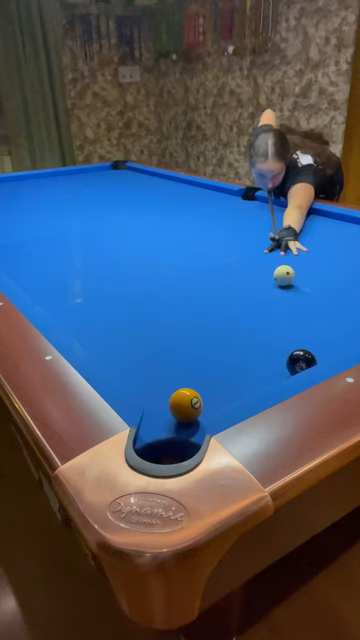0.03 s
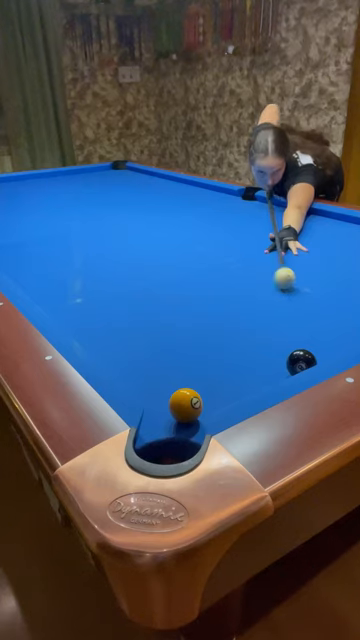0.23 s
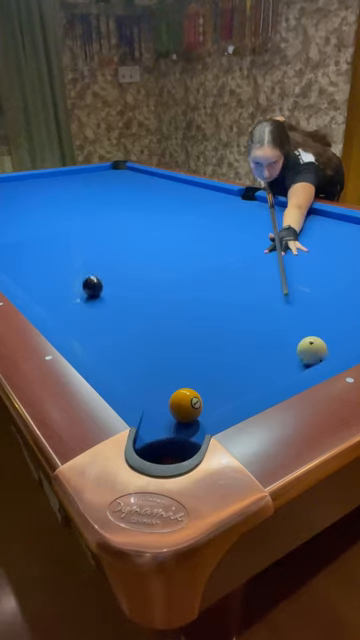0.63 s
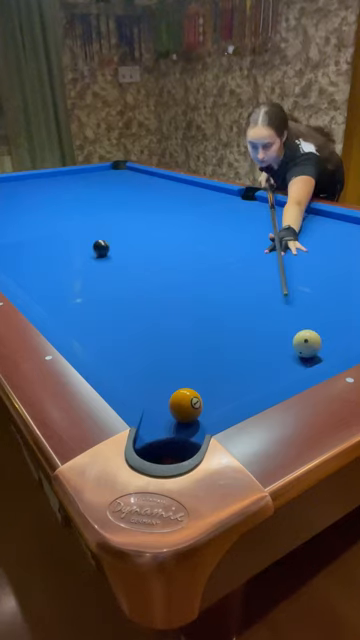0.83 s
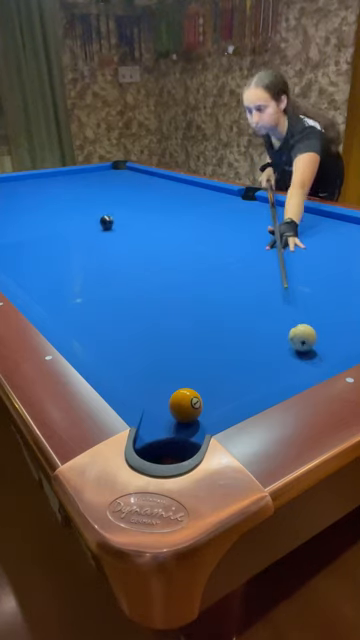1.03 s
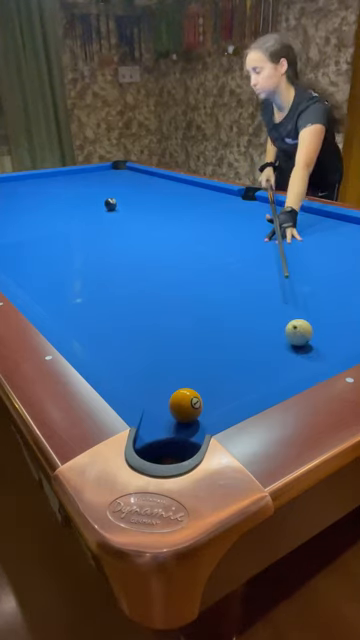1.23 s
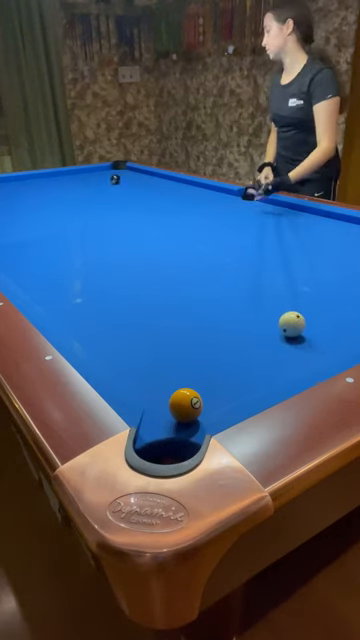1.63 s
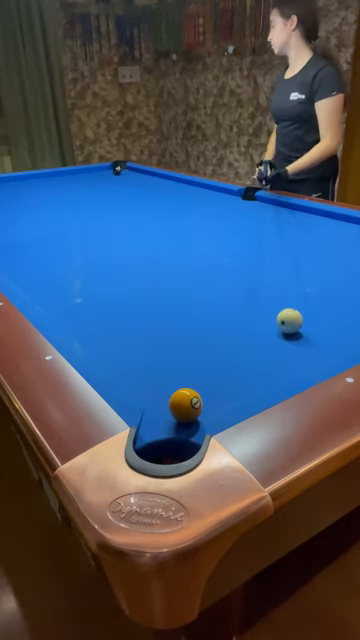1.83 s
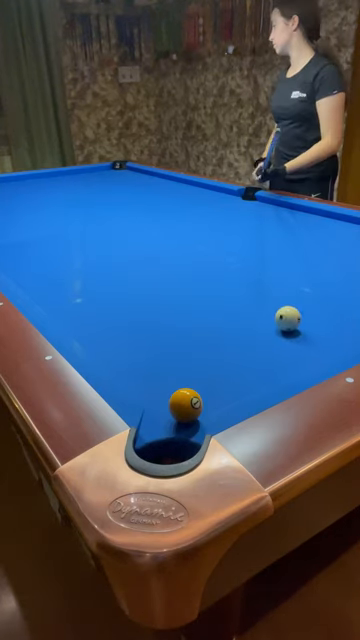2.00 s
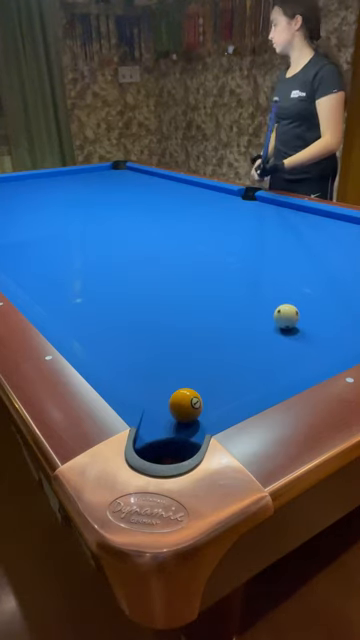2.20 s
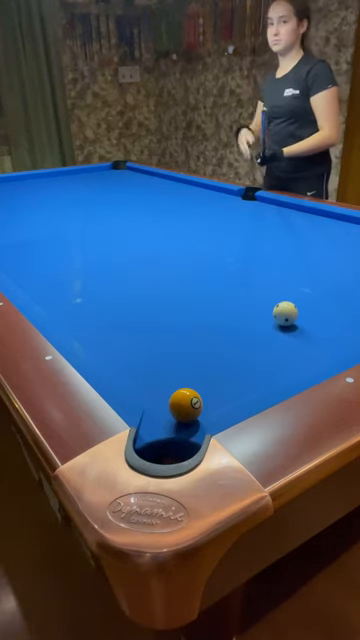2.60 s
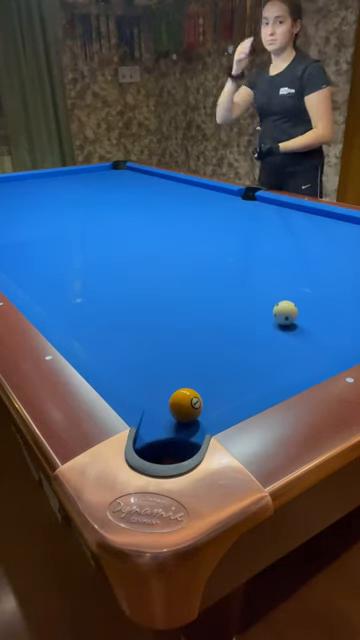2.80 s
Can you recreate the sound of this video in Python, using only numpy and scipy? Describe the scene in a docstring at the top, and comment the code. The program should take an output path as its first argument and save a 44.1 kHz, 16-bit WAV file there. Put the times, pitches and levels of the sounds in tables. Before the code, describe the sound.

Pool balls crack together in an echoing hall, roll, and one clatters into a pocket.

```python
"""One pool shot in a reverberant hall, heard from a corner of the table.
The cue tip knocks the white ball, which cracks into the black, and a limiter ducks the hall.
The balls bump the cushions and rumble over the slate while the cue hisses back over the glove.
Last, the black drops into the far pocket, clacks on the balls below and rolls on inside the table."""
import sys
import numpy as np
from scipy import signal
from scipy.fft import rfft, irfft, next_fast_len
from scipy.io import wavfile
from scipy.ndimage import uniform_filter1d, minimum_filter1d

SR = 44100
rng = np.random.default_rng(int(sys.argv[2]) if len(sys.argv) > 2 else 0)


def dump_mix(stems):
    """Bounce the given channels to the path in sys.argv[1] as a 16-bit WAV at rate SR."""
    frames = np.atleast_2d(stems).T  # one column per channel
    limited = np.clip(frames, -1, 1)  # hard clip at full scale
    pcm = np.round(limited * 32767).astype(np.int16)
    wavfile.write(sys.argv[1], SR, pcm)


N = 130095

# Decay of the hall. Each row: frequency in Hz, seconds to fall 60 dB.
HALL_DECAY = [(60, 0.46), (250, 1.027), (800, 0.87), (2400, 1.037), (4000, 0.88), (7000, .65),
              (12000, 0.21)]
# Stereo image of diffuse sound. Each row: frequency in Hz, left-right likeness (1 is mono).
STEREO_LIKENESS = [(100, 1), (300, 0.97), (600, 0.51), (1200, 0.35), (2400, 0.6), (5000, .55), (12000, .1)]
# Tone of still air, glove hiss and rumbling slate. Each row: frequency in Hz, relative level in dB.
AIR_EQ = [(25, -11.5), (70, 1.5), (150, 0.5), (400, -14.5), (700, -22), (1300, -22), (2500, -24.5),
          (9000, -30), (15000, -38)]
GLOVE_EQ = [(600, -16.5), (2500, -0.5), (4500, -2.5), (7500, 0), (10000, -2.5), (12500, -8.5), (14000, -25)]
SLATE_EQ = [(30, -34.5), (55, -16), (68, 5), (78, -5.5), (91, 3.5), (112, -13.5), (136, -5.5), (150, 4),
            (170, -11), (215, -7), (260, -17), (400, -21.5), (600, -43.5), (900, -41.5), (2000, -51.5),
            (6000, -91)]
# Fader rides for the sliding cue, the roll on the cloth, its faint ring and the ball return.
# Each row: time in seconds, level in dB.
SLIDE_FADER = [(0.82, -100), (0.9, -70), (1.15, -71.5), (1.37, -70), (1.405, -65), (1.44, -72),
               (1.55, -72.5), (1.64, -100)]
ROLL_FADER = [(0.24, -72), (0.36, -39), (0.68, -39), (0.95, -48), (1.34, -56.5), (1.53, -50.5), (1.72, -54),
              (2.03, -58), (2.2, -63)]
WHIRR_FADER = [(1.4, -87), (1.59, -73), (1.68, -79), (1.76, -89), (1.9, -86), (1.97, -79), (2.05, -84),
               (2.15, -87)]
RETURN_FADER = [(2.05, -61), (2.08, -36.5), (2.33, -32.5), (2.45, -43), (2.56, -31), (2.78, -40.5),
                (3.0, -53)]
# Resonances of the cabinet. Each row: centre in Hz, width in Hz, relative level in dB.
CABINET_MODES = [(66, 5, 0), (91, 7, -6), (107, 7, -1), (135, 7, 2), (192, 14, -7), (254, 10, -1),
                 (316, 22, -6), (433, 22, -10), (583, 30, -16)]
# Resonances of the pocket's casing. Each row: centre in Hz, boost in dB.
CASING_MODES = [(583, 8), (645, 6), (930, 5), (1060, 6), (1185, 8), (1480, 5), (1884, 7), (1933, 6),
                (2342, 6), (2419, 5), (2581, 6), (2850, 6), (3230, 6)]
# Ring of the cue shaft. Each row: pitch in Hz, typical level in dB, seconds to fall 60 dB.
SHAFT_MODES = [(856, -28.5, 0.14), (1633, -23.5, 0.058), (2260, -37, .12), (2920, -51, .12)]

# The contacts. Each row: start in seconds, direct peak before panning in dB, hall send in dB.
POCKET_HITS = [(2.036, -55, -50), (2.059, -24, -31.5), (2.085, -29.5, -34.5), (2.145, -50, -36.5)]  # ball on the pocket's jaw and liner
CLACK_HITS = [(2.265, -19, -29), (2.279, -19, -52), (2.4804, -15, -27.5), (2.4892, -23, -40),
              (2.522, -32, -40)]  # ball on the balls below
CUSHION_HITS = [(0.365, -30, -30), (0.525, -25.5, -36), (0.81, -39, -49.5), (1.39, -51, -60)]  # ball on rubber
CUE_HITS = [(0.2403, -5.5, -23)]  # tip on white
CRACK_HITS = [(0.3297, 5.5, -12)]  # white on black
# Tone of each contact; cue and crack have a second one for their reverb.
# Each row: frequency in Hz, relative level in dB.
LINER_EQ = [(30, -18), (76, -40), (128, 4.5), (220, -10.5), (420, -5), (640, -8), (760, -18), (2100, -22.5),
            (2630, -19), (3400, -28.5), (5720, -38.5), (9600, -53.5), (14000, -118)]
CLACK_EQ = [(100, -12), (280, -3.5), (600, -0.5), (750, -7.5), (1150, -3.5), (1500, -5), (1900, -3.5),
            (2150, -2.5), (2450, 0), (3200, -8), (4000, -27), (5000, -29.5), (7000, -37.5), (11000, -40.5),
            (14000, -54)]
CUSHION_EQ = [(30, -48.5), (65, -8), (100, 4), (160, -4), (300, -10), (600, -31), (2000, -61), (8000, -93)]
CUE_EQ = [(40, -41), (100, -20.5), (200, -6), (430, -1), (850, 1.5), (1200, -4), (1600, -18), (2700, -22.5),
          (5000, -40.5), (11000, -44), (15000, -73.5)]
CUE_HALL_EQ = [(50, -23.5), (130, -2.5), (250, -4.5), (430, 1), (700, -5.5), (1300, -7.5), (1850, -14),
               (2590, -3), (2950, -10.5), (7160, -23.5), (11600, -35), (15000, -74)]
CRACK_EQ = [(100, -23.5), (600, -22), (1300, -6), (2100, -1.5), (2700, -16), (3400, -20), (4000, -9),
            (4400, -18), (5500, -41.5), (8000, -37.5), (12300, -57), (13500, -33), (14500, -30),
            (16000, -55)]
CRACK_HALL_EQ = [(60, -24.5), (130, -8.5), (330, -11.5), (520, -21), (1150, -17), (1700, -8), (2450, -0.5),
                 (3300, -12.5), (5260, -34.5), (9000, -46), (11400, -47.5), (12500, -68.5), (15000, -76)]

FLUTTER_S, FLUTTER_SHARE = 0.00934, 0.3  # echo between table and ceiling: round trip, share returned
LEFT_LAG_S = 0.00003  # direct sound reaches the left microphone later
CEILING_DB, HOLD_S, RELEASE_S = -1, 0.18, 0.13  # limiter
TOP_HZ = 15700


def amp(db):
    """Gain of a level in dB."""
    return 10 ** (np.asarray(db) / 20)


def curve_at(points, hz):
    """Read a curve of (Hz, value) points on a log frequency axis."""
    knots_hz, values = np.transpose(points)
    return np.interp(np.log(hz + 1), np.log(knots_hz + 1), values)


def eq(points):
    """Frequency response through (Hz, dB) points."""
    return lambda hz: amp(curve_at(points, hz))


def fader(rows):
    """Gain per sample from (seconds, dB) rows, silent outside them."""
    return amp(np.interp(np.arange(N) / SR, *np.transpose(rows), left=-np.inf, right=-np.inf))


def add(track, start_s, sound):
    """Lay a sound into the track."""
    i = round(start_s * SR)
    track[:, i:i + sound.shape[-1]] += sound[..., :N - i]


def filtered(sound, response):
    """Run a sound through a frequency response."""
    size = next_fast_len(N + SR // 2)
    hz = np.fft.rfftfreq(size, 1 / SR)
    return irfft(rfft(sound, size) * response(hz), size)[..., :N]


def diffuse(response):
    """Coloured stereo noise of rms 1, near mono in the bass."""
    def mid_side(hz):
        spread = np.arccos(np.clip(curve_at(STEREO_LIKENESS, hz), -1, 1)) / 2
        return response(hz) * np.array([np.cos(spread), np.sin(spread)])
    mid, side = filtered(rng.standard_normal((2, N)), mid_side)
    noise = np.array([mid + side, mid - side])
    return noise / np.sqrt(np.mean(noise ** 2) + 1e-20)


def room_tone():
    """A quiet bed of still air."""
    return amp(-74) * diffuse(eq(AIR_EQ))


def hall(response, build_s, early_db, early_s):
    """Early reflections, then a fluttering tail that swells and dies band by band."""
    flutter = lambda hz: 1 / (1 - FLUTTER_SHARE * np.exp(-2j * np.pi * hz * FLUTTER_S))
    wash = diffuse(lambda hz: response(hz) * flutter(hz))
    hz, frame_s, bands = signal.stft(wash, SR, nperseg=512)
    decay = amp(-60 * frame_s / curve_at(HALL_DECAY, hz)[:, None])
    tail = signal.istft(bands * decay, SR, nperseg=512)[1][:, :N]
    t = np.arange(N) / SR
    swell = 1 - np.exp(-(t / build_s) ** 2)
    early = amp(early_db) * np.exp(-t / early_s)
    return tail * (swell + early)


def glove_slide():
    """The shaft hisses softly over the glove."""
    return fader(SLIDE_FADER) * diffuse(eq(GLOVE_EQ))


def slate_roll():
    """Rolling balls rumble on the slate and ring faintly around 2400 Hz."""
    rumble = diffuse(eq(SLATE_EQ))
    whirr = diffuse(lambda hz: 1 / (1 + ((hz - 2400) / 260) ** 2))
    return fader(ROLL_FADER) * rumble + fader(WHIRR_FADER) * whirr


def ball_return(muffle_hz=750):
    """The potted ball rolls through the cabinet and stirs its low resonances."""
    def cabinet(hz):
        modes = sum((-1) ** k * amp(db) * 1j * hz * width / (centre ** 2 - hz ** 2 + 1j * hz * width)
                    for k, (centre, width, db) in enumerate(CABINET_MODES))
        return modes / (1 + (hz / muffle_hz) ** 4)
    return fader(RETURN_FADER) * diffuse(cabinet)


def transient(tone, spread_hz=1700, phase_turns=4, size=4096):
    """The click of one contact, with peak 1 and lows that trail a little."""
    hz = np.fft.rfftfreq(size, 1 / SR)
    cepstrum = irfft(np.log(eq(tone)(hz)))
    cepstrum[1:size // 2] *= 2  # minimum phase packs the energy into the attack
    cepstrum[size // 2 + 1:] = 0
    smear = phase_turns * np.arctan(hz / spread_hz) / np.arctan(hz[-1] / spread_hz)
    click = irfft(np.exp(rfft(cepstrum) - 2j * np.pi * smear))
    return click[:size // 2] / np.abs(click).max()


def impacts(hits, tone, hall_response, pan_db, hall_pan_db, **hall_shape):
    """Each contact sends a click to the microphones and sets off the hall. Positive pan is left."""
    direct, reverb = np.zeros((2, 2, N))
    click = transient(tone)
    for start_s, peak_db, send_db in hits:
        add(direct, start_s, amp(peak_db) * click)
        add(reverb, start_s, amp(send_db) * hall(hall_response, **hall_shape))
    sides = np.array([[0.5], [-0.5]])
    direct = filtered(direct, lambda hz: np.exp(-2j * np.pi * hz * LEFT_LAG_S * sides))
    return direct * amp(pan_db * sides) + reverb * amp(hall_pan_db * sides)


def cushion_bumps():
    """Balls rebound from the rubber with dull thuds."""
    return impacts(CUSHION_HITS, CUSHION_EQ, eq(CUSHION_EQ), pan_db=-1.5, hall_pan_db=-3.5,
                   build_s=0.06, early_db=-9.5, early_s=0.03)


def pocket_drop(mode_width_hz=22, lowpass_hz=12000):
    """The ball hits the liner, then other balls; the casing rings; a low-pass softens the top treble."""
    def casing(hz):
        boost = sum((amp(db) - 1) / (1 + (2 * (hz - centre) / mode_width_hz) ** 2)
                    for centre, db in CASING_MODES)
        return eq(CLACK_EQ)(hz) * (1 + boost)
    rattle = impacts(POCKET_HITS, LINER_EQ, eq(LINER_EQ), pan_db=0.5, hall_pan_db=-1,
                     build_s=0.0069, early_db=-1.5, early_s=0.012)
    clacks = impacts(CLACK_HITS, CLACK_EQ, casing, pan_db=0, hall_pan_db=-0.7,
                     build_s=0.018, early_db=2.5, early_s=0.012)
    return filtered(rattle + clacks, lambda hz: 1 / (1 + (hz / lowpass_hz) ** 16))


def shaft_ring(attack_s=0.002):
    """The shaft's damped modes, a little different in level and phase at each microphone."""
    t = np.arange(SR) / SR
    ring = np.zeros((2, SR))
    for hz, db, decay_s in SHAFT_MODES:
        envelope = amp(db + rng.normal(0, 0.72, (2, 1)) - 60 * t / decay_s)
        phase = rng.uniform(0, 2 * np.pi) + rng.normal(0, 0.84, (2, 1))
        ring += envelope * np.sin(2 * np.pi * hz * t + phase)
    return ring * (1 - np.exp(-t / attack_s))


def cue_strike():
    """The leather tip knocks the white ball, right of centre, and the shaft rings briefly."""
    knock = impacts(CUE_HITS, CUE_EQ, eq(CUE_HALL_EQ), pan_db=-2, hall_pan_db=-2,
                    build_s=0.02, early_db=-3, early_s=0.012)
    add(knock, CUE_HITS[0][0], shaft_ring())
    return knock


def ball_crack():
    """White meets black: the hard, bright crack that tops the mix."""
    return impacts(CRACK_HITS, CRACK_EQ, eq(CRACK_HALL_EQ), pan_db=-2.5, hall_pan_db=-0.5,
                   build_s=0.028, early_db=-1, early_s=0.017)


def scene():
    """The hits over the rolling, the glove and the room tone."""
    hits = cue_strike() + ball_crack() + cushion_bumps() + pocket_drop()
    return hits + slate_roll() + ball_return() + glove_slide() + room_tone()


def record(dry):
    """A limiter clamps at once, holds and lets go; a brick-wall low-pass trims the top."""
    peak_db = 20 * np.log10(np.abs(dry).max(axis=0) + 1e-9)
    duck_db = np.minimum(0, CEILING_DB - peak_db)
    hold, release = int(HOLD_S * SR) | 1, int(RELEASE_S * SR) | 1
    held_db = minimum_filter1d(duck_db, hold, origin=hold // 2)
    gain_db = np.minimum(held_db, uniform_filter1d(held_db, release, origin=release // 2))
    gain_db = uniform_filter1d(minimum_filter1d(gain_db, size=89), size=89)  # 2 ms look-ahead
    return filtered(dry * amp(gain_db), lambda hz: hz < TOP_HZ)


dry = scene()
out = record(dry)
dump_mix(out)
```